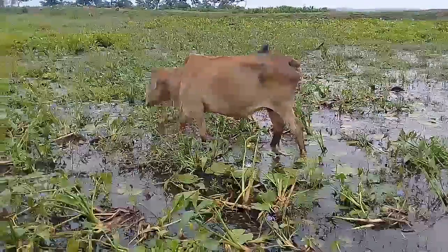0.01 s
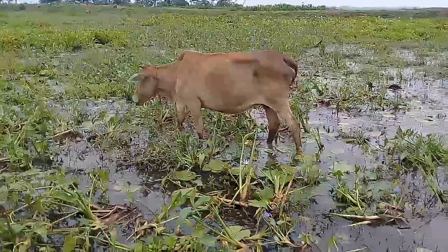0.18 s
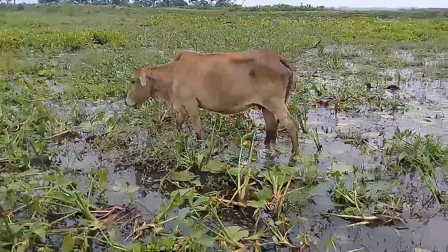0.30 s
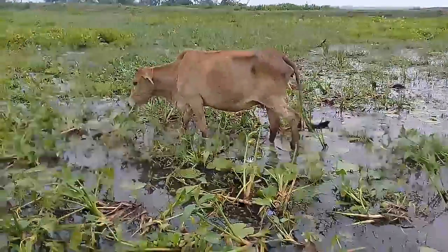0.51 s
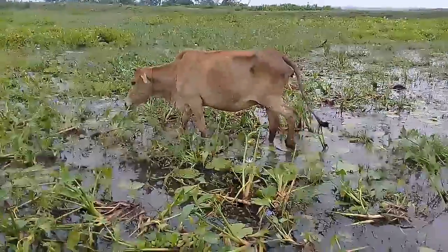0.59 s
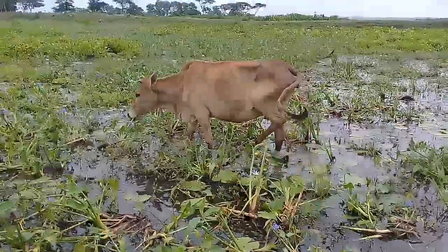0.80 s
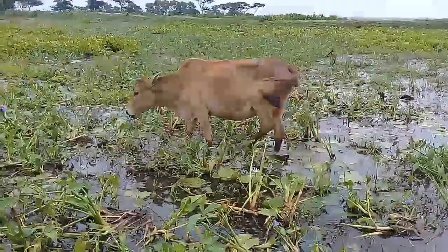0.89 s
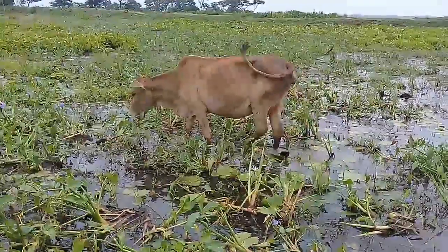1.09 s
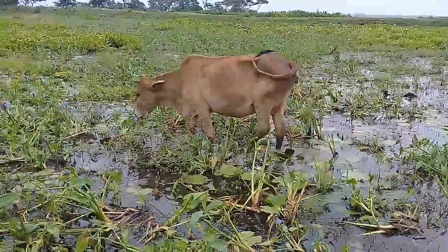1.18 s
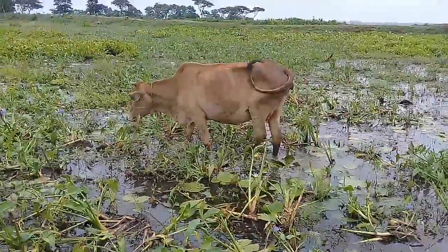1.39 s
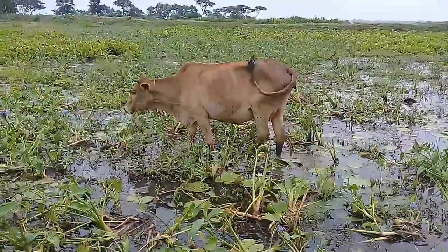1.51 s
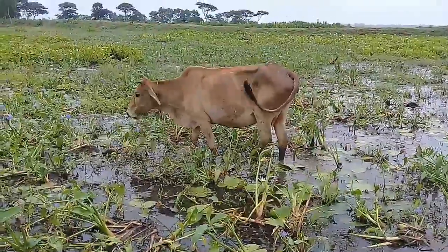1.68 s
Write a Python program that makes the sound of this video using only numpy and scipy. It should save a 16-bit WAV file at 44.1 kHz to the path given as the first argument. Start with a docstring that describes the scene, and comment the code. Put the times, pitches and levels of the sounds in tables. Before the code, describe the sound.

A cow's hooves plop, smack and squelch through shallow marsh water, with wind thumps and insect trill

```python
"""A cow wades through a shallow marsh. First a hoof plops and smacks amid gurgle and spray; then a gust
buffets the microphone; then a dragged leg swishes, and more steps bring plops, gurgle and spray; last come
a burst of wet smacks and a hollow ringing. Insects trill throughout over a quiet open field.
Bubbles and drops are damped sinusoids; smacks, wind, chorus and field are filtered noise."""
import sys
import numpy as np
from scipy import signal
from scipy.fft import rfft, irfft, next_fast_len
from scipy.io import wavfile
from scipy.ndimage import uniform_filter1d

SR = 44100
rng = np.random.default_rng(int(sys.argv[2]) if len(sys.argv) > 2 else 0)


def to_wav(sig):
    """Store sig (one row per channel, or 1-D mono) as 16-bit WAV at the path in sys.argv[1].

    Samples outside -1..1 are clipped; the rate is SR.
    """
    pcm = np.clip(np.atleast_2d(sig), -1, 1) * 32767
    pcm = np.round(pcm).astype(np.int16)
    wavfile.write(sys.argv[1], SR, pcm.T)  # frames by channels


N = 74970  # samples, 1.7 s

# Each *_TRIM_DB is a gain added to the levels of its table.
# Water churned by the hooves: (time [s], level [dB])
GURGLE = [(0, -48), (.046, -60.5), (.072, -52.5), (.15, -75.5), (.6, -83.5), (.73, -74.5), (.818, -53),
          (.885, -57.5), (.94, -71), (.984, -52.5), (1.035, -54.5), (1.15, -61), (1.174, -72), (1.31, -92),
          (1.335, -61), (1.392, -70), (1.402, -59), (1.525, -56.5), (1.556, -70.5), (1.7, -77)]
# Colour of the churned water: (frequency [Hz], level [dB])
GURGLE_SPECTRUM = [(300, -33), (750, -13), (1150, -20.5), (1350, -13), (1530, 0), (1900, -4.5), (2200, -1),
                   (2600, -7), (4200, -17), (8000, -38)]
GURGLE_TRIM_DB, BUBBLES_PER_S = -3, 1200
BUBBLE_CYCLES = 22.7  # mean number of nominal cycles in a 60 dB decay
BUBBLE_RISE = 0.03  # share by which the pitch rises during a 60 dB decay
BUBBLE_SPREAD_DB = 2.5  # scale of the exponential spread of bubble levels
WASH_SHARE = 0.037  # smooth rush under the grains, rms relative to theirs before colouring

# A leg dragging through the water: (peak time [s], level [dB], swell [s], fade [s])
SWISHES = [(0.254, -72, 0.018, 0.056), (0.427, -69, 0.0045, 0.033), (0.769, -52, 0.015, 0.012),
           (.815, -54, 0.014, 0.019), (0.858, -58, 0.014, 0.041)]
# Narrow band of like-sized bubbles: (frequency [Hz], level [dB])
SWISH_SPECTRUM = [(600, -26), (790, -19), (1100, -26.5), (1700, -28), (2000, -7), (2200, 4.5),
                  (2400, -11.5), (2700, -9.5), (3300, -37), (6000, -52)]

# Spray and drops thrown by the hooves: (time [s], level [dB])
SPRAY = [(0, -57.5), (.026, -62.5), (.052, -71.5), (.072, -60), (.09, -67), (.164, -78), (.41, -85.5),
         (.43, -67), (.524, -84.5), (.72, -78), (.865, -62.5), (.895, -64.5), (.946, -68), (.984, -55),
         (1.054, -62.5), (1.08, -58), (1.15, -61), (1.174, -71.5), (1.316, -87), (1.42, -63.5),
         (1.465, -65), (1.488, -57), (1.499, -62), (1.52, -57), (1.54, -80), (1.7, -82)]
# Colour of the spray: (frequency [Hz], level [dB])
SPRAY_SPECTRUM = [(400, -29), (900, -13), (2000, 10), (3000, -5), (3800, 1.5), (4650, -2), (5100, 1.5),
                  (5850, 2), (6200, -3), (7000, -7.5), (8500, -9.5), (11000, -16), (15500, -15)]
SPRAY_TRIM_DB, DROPS_PER_S, DROP_CYCLES, DROP_SPREAD_DB = -2.5, 2200, 65, 3.5
SPATTER_HZ, SPATTER_DB = 108, 1  # drops land in clumps: speed and rms depth

# The finest droplets, swelling up to the end of each splash: (end time [s], level [dB], swell [s])
FIZZES = [(0.086, -69, .04), (.44, -69, 0.013), (1.0, -72, 0.02), (1.15, -73, 0.26), (1.441, -66.5, 0.018),
          (1.521, -62.5, 0.04)]
# Colour of the fine droplets: (frequency [Hz], level [dB])
FIZZ_SPECTRUM = [(5000, -21), (7000, -5), (8500, 1), (9700, 3), (11200, 1), (12500, -10), (15500, -17)]
FIZZ_RELEASE_S, FIZZ_PER_S, FIZZ_CYCLES, FIZZ_SPREAD_DB = 0.0073, 3400, 32, 3

# Single air pockets that pop:
# (time [s], level [dB], starting pitch [Hz], 60 dB decay time [s], pitch rise per 10 ms [share])
PLOPS = [(0.0232, -40, 934, 0.014, 0.093), (.4235, -49, 2180, 0.019, 0.03), (.751, -55, 2130, 0.031, 0.023),
         (.8046, -38.5, 2180, 0.014, .02), (.8155, -34, 2150, 0.011, 0.021), (.818, -48, 1620, .04, .03),
         (0.976, -43.5, 1530, 0.04, 0.051), (1.0266, -26, 2140, 0.0092, 0.11),
         (1.0441, -36, 1920, 0.014, 0.04), (1.0572, -40, 1910, .01, 0.086), (1.124, -51, 3234, .05, 0.011),
         (1.138, -41.5, 2197, 0.029, 0.035), (1.325, -50.5, 1294, 0.055, 0.17),
         (1.366, -54, 1355, 0.066, 0.12), (1.3989, -36.5, 1546, 0.023, 0.484),
         (1.4065, -39, 2380, 0.02, .16), (1.408, -47, 1480, .04, .02), (1.429, -54, 9850, .035, .01),
         (1.4385, -49, 9900, .014, .01), (1.445, -48, 1133, 0.075, 0.029),
         (1.4482, -41.5, 1510, 0.022, 0.088), (1.449, -45, 2350, .02, .03),
         (1.47, -38.5, 1760, 0.014, 0.058), (1.586, -52, 2660, 0.017, 0.073),
         (1.629, -58, 1890, 0.039, 0.035)]
PLOP_ATTACK_S, PLOP_TRIM_DB = 0.0011, -5.5

# Wet smacks of mud and water: (time [s], level [dB], 60 dB decay time [s], centre of the tint [Hz])
SMACKS = [(0.0133, -38, 0.013, 1890), (.0138, -39, 0.022, 6500), (0.0744, -46, .008, 9500),
          (0.079, -38.5, 0.013, 3560), (.095, -51.5, 0.016, 6000), (0.115, -51, 0.024, 6500),
          (.817, -42, .018, 2400), (0.984, -43.5, 0.031, 4300), (1.091, -44, 0.024, 2200),
          (1.112, -55, .01, 6500), (1.445, -42, .026, 1800), (1.457, -43, 0.0094, 5500),
          (1.4692, -44, 0.011, 4200), (1.4782, -38, 0.011, 3900), (1.4843, -42, .02, 4500),
          (1.4912, -45.5, 0.01, 6000), (1.504, -47, .014, 6000), (1.510, -45, 0.014, 5500),
          (1.516, -39.5, 0.015, 4770)]
# Colour shared by the smacks before each tint: (frequency [Hz], level [dB])
SMACK_SPECTRUM = [(300, -45), (1100, -5), (1650, 0.5), (6000, -1.5), (7500, -7), (11000, -4), (15000, -25)]
SMACK_ATTACK_S, SMACK_WIDTH_OCT, SMACK_TRIM_DB = 0.0007, 0.93, -8.5

# The hoof's hollow rings as the last splash drains into it: (mean frequency [Hz], mean level [dB])
HOLLOW = [(3490, -61), (3660, -58), (4160, -61), (5050, -63.5), (5990, -69.5)]
HOLLOW_FULL_S, HOLLOW_END_S, HOLLOW_SWELL_S, HOLLOW_RELEASE_S = 1.493, 1.521, 0.04, 0.0034
HOLLOW_WAVER_HZ, HOLLOW_FLUTTER_DB = 30.3, 2.5  # rms depth in pitch and in level
HOLLOW_FLUTTER_HZ = 110.6  # speed of both

TAIL_T60_S, TAIL_DB = 0.15, -11.5  # scatter from the water and plants

# Wind at the microphone: (time [s], level [dB])
WIND = [(0, -49), (.075, -59), (.15, -54), (.24, -39), (.30, -38.5), (.355, -42), (.375, -56.5),
        (.43, -42.5), (.455, -35.5), (.48, -49.5), (.55, -49), (.59, -55.5), (.625, -51), (.74, -51.5),
        (.79, -46), (.86, -57.5), (.93, -65), (1.12, -66), (1.2, -62), (1.27, -70.5), (1.35, -59),
        (1.43, -66.5), (1.49, -55), (1.56, -67.5), (1.7, -65.5)]
# Colour of the wind rumble: (frequency [Hz], level [dB])
WIND_SPECTRUM = [(20, -9), (40, -3.5), (62, 3), (90, 3.5), (115, -2), (160, -10.5), (250, -16.5),
                 (350, -26), (600, -42.5), (1500, -105)]
# Single eddies that thump the microphone: (time [s], peak level [dB], width [s])
THUMPS = [(0.2386, -31, 0.0031), (.256, -28, 0.0018), (0.2846, -26, 0.0015), (0.304, -25.5, 0.002),
          (0.3372, -25.5, 0.0017), (.354, -25.5, 0.0027), (.452, -25.5, 0.0022), (0.55, -37, 0.003),
          (.643, -43, .0028), (1.201, -51, .0028)]

# The nearest insect: a train of tiny falling chirps
TRILL_PER_S, TRILL_HZ, TRILL_FALL_HZ, TRILL_DB = 180, 9344, 565, -75
TRILL_RATE_DRIFT, TRILL_PITCH_SCATTER_HZ = 0.037, 54.9  # rms share of the rate, rms pitch

# Colour of the insect chorus: (frequency [Hz], level [dB])
INSECTS = [(7000, -26.5), (8400, -13), (9000, -11), (9200, -1), (9450, -3), (9700, -4.5), (10000, -6),
           (10200, -25), (12000, -51)]
INSECT_DB = -76
# Colour of the open field's air: (frequency [Hz], level [dB])
FIELD = [(30, -1.5), (70, 9), (115, 14.5), (190, 6.5), (300, 4), (600, -3.5), (1000, -6), (1600, -11),
         (2250, -8), (3200, -16.5), (4300, -22), (5400, -15.5), (7000, -20.5), (11000, -20), (15500, -20.5)]
FIELD_DB = -65.5
# Colour of a faint hiss, opposite in the two channels: (frequency [Hz], level [dB])
HISS = [(100, -19), (350, -3.5), (650, 0.5), (1200, -8.5), (2500, -10), (5000, 4), (9000, 5.5), (12000, 8),
        (15500, 5), (17000, -28)]
HISS_DB = -84.5
TOP_HZ = 15600


def amp(db):
    """Level and gain: 20 dB is a factor of ten in amplitude."""
    return 10 ** (np.asarray(db) / 20)


def unit(x):
    """Normalization: scale a signal to rms 1."""
    return x / np.sqrt(np.mean(x ** 2) + 1e-20)


def curve(rows):
    """Linear interpolation: one value per sample from (time, value) rows."""
    return np.interp(np.arange(N) / SR, *np.transpose(rows))


def filtered(x, response):
    """Linear filtering: multiply the spectrum by a response of frequency."""
    m = next_fast_len(N + SR // 2)  # zero padding
    spectrum = rfft(x, m) * response(np.fft.rfftfreq(m, 1 / SR))
    return irfft(spectrum, m)[..., :N]


def colour(x, points):
    """Spectral shaping: levels are interpolated over log frequency."""
    f, db = np.transpose(points)
    return filtered(x, lambda hz: amp(np.interp(np.log(hz + 1), np.log(f), db)))


def noise(points):
    """Coloured noise: a shaped Gaussian random signal of rms 1."""
    return unit(colour(rng.standard_normal(N), points))


def wobble(hz):
    """Random modulation: low-passed noise of rms 1 that moves at up to about hz."""
    return unit(filtered(rng.standard_normal(N), lambda f: np.exp(-(f / hz) ** 2)))


def even(x, size):
    """Level control: divide by the local rms over stretches of size samples."""
    power = uniform_filter1d(uniform_filter1d(x ** 2, size), size)
    return x / np.sqrt(np.abs(power) + 1e-12)


def add(track, s, sound):
    """Superposition: mix a sound into the track at time s."""
    part = track[max(round(s * SR), 0):][:len(sound)]
    part += sound[:len(part)]


def swell_and_fade(peak_s, swell_s, fade_s):
    """Exponential growth up to a peak of 1, then exponential decay."""
    t = np.arange(N) / SR
    return np.exp(np.minimum((t - peak_s) / swell_s, (peak_s - t) / fade_s))


def grains(per_s, lo_hz, hi_hz, cycles, rise, spread_db, size):
    """Sum of many damped oscillators, each rising in pitch, on a smooth wash of noise."""
    when, pitch, strength, life = rng.random((int(per_s * N / SR), 4)).T[:, :, None]
    hz = lo_hz * (hi_hz / lo_hz) ** pitch
    turns = hz * np.arange(size) / SR
    age = turns / (cycles * (.5 + life))  # 1 after a 60 dB decay
    level_db = -spread_db * np.log(1 - .98 * strength) - 60 * age
    waves = amp(level_db) * np.sin(2 * np.pi * turns * (1 + rise * age / 2))
    samples = (when * N).astype(int) + np.arange(size)
    weighted = waves * np.sqrt(hz)  # higher grains are stronger
    stream = np.bincount(samples.ravel(), weighted.ravel(), N)[:N]
    return unit(stream) + WASH_SHARE * rng.standard_normal(N)


def gurgle():
    """Bubble resonance: small bubbles stirred up around the legs ring as damped oscillators."""
    bubbles = grains(BUBBLES_PER_S, 614, 3594, BUBBLE_CYCLES, BUBBLE_RISE, BUBBLE_SPREAD_DB, size=1200)
    return amp(curve(GURGLE) + GURGLE_TRIM_DB) * even(colour(bubbles, GURGLE_SPECTRUM), size=600)


def plops():
    """Resonance of an air pocket: it rings briefly and rises in pitch as it surfaces."""
    out, t = np.zeros(N), np.arange(SR // 20) / SR
    for s, db, hz, t60, rise in PLOPS:
        shape = (1 - np.exp(-(t / PLOP_ATTACK_S) ** 2)) * 1000 ** (-t / t60)
        turns = hz * t * (1 + rise * t / .01 / 2)  # integral of a linear pitch rise
        add(out, s, amp(db + PLOP_TRIM_DB) * shape / shape.max() * np.sin(2 * np.pi * turns))
    return out


def smacks():
    """Impulsive noise: short tinted bursts where the mud lets go or water slaps back."""
    out, t = np.zeros(N), np.arange(SR // 20) / SR
    pieces = noise(SMACK_SPECTRUM)[:len(SMACKS) * len(t)].reshape(len(SMACKS), len(t))
    freqs = np.fft.rfftfreq(len(t), 1 / SR) + 1
    for (s, db, t60, hz), spectrum in zip(SMACKS, rfft(pieces)):
        tint = 1 / (1 + (np.log2(freqs / hz) / SMACK_WIDTH_OCT) ** 2)
        slap = even(irfft(spectrum * tint, len(t)), size=100)
        burst = (1 - np.exp(-t / SMACK_ATTACK_S)) * 1000 ** (-t / t60)
        add(out, s, amp(db + SMACK_TRIM_DB) * burst / burst.max() * slap)
    return out


def spray():
    """Superposed drop impacts: drops patter in clumps on water and leaves, each with a short ring."""
    drops = grains(DROPS_PER_S, 2544, 8360, DROP_CYCLES, BUBBLE_RISE, DROP_SPREAD_DB, size=1200)
    level_db = curve(SPRAY) + SPRAY_TRIM_DB + SPATTER_DB * wobble(SPATTER_HZ)
    return amp(level_db) * even(colour(drops, SPRAY_SPECTRUM), size=600)


def swish():
    """Narrow-band bubble resonance: each dragged leg swells and fades in one bubbling band."""
    shape = sum(amp(db) * swell_and_fade(s, swell, fade) for s, db, swell, fade in SWISHES)
    bubbles = grains(BUBBLES_PER_S, 620, 3630, BUBBLE_CYCLES, BUBBLE_RISE, BUBBLE_SPREAD_DB, size=1000)
    return shape * even(colour(bubbles, SWISH_SPECTRUM), size=500)


def fizz():
    """High-pitched damped ringing: the finest droplets build through a splash and stop quickly."""
    shape = sum(amp(db) * swell_and_fade(s, swell, FIZZ_RELEASE_S) for s, db, swell in FIZZES)
    droplets = grains(FIZZ_PER_S, 6500, 12100, FIZZ_CYCLES, BUBBLE_RISE, FIZZ_SPREAD_DB, size=300)
    return shape * even(colour(droplets, FIZZ_SPECTRUM), size=700)


def hollow():
    """Cavity resonance: a few wavering tones swell under the last splash and stop with it."""
    t = np.arange(N) / SR
    swell = (t - HOLLOW_FULL_S) / HOLLOW_SWELL_S
    release = (HOLLOW_END_S - t) / HOLLOW_RELEASE_S
    shape = np.exp(np.minimum(np.minimum(swell, release), 0))  # holds at 1 between the two
    out = np.zeros(N)
    for hz, db in HOLLOW:
        turns = np.cumsum(hz + HOLLOW_WAVER_HZ * wobble(HOLLOW_FLUTTER_HZ)) / SR
        level_db = db + HOLLOW_FLUTTER_DB * wobble(HOLLOW_FLUTTER_HZ)
        out += amp(level_db) * np.sin(2 * np.pi * turns)
    return shape * out


def scatter(x):
    """Diffuse scattering: convolution with decaying noise gives a short tail from water and plants."""
    t = np.arange(SR // 4) / SR
    tail = rng.standard_normal(len(t)) * 1000 ** (-t / TAIL_T60_S)
    return signal.fftconvolve(x, tail / np.linalg.norm(tail))[:N]


def wind():
    """Turbulent pressure: low rumble follows the gust, and single eddies thump the microphone."""
    out = amp(curve(WIND)) * even(noise(WIND_SPECTRUM), size=900)
    for s, db, width in THUMPS:
        u = (np.arange(N) / SR - s) / width
        out += amp(db) * (1 - u ** 2) * np.exp(-u ** 2 / 2)  # a pulse with a dip on either side
    return out


def trill():
    """Amplitude and frequency modulation: one insect's rapid pulses, each sliding down in pitch."""
    rate = TRILL_PER_S * (1 + TRILL_RATE_DRIFT * wobble(16))
    cycle = np.cumsum(rate) / SR % 1
    hz = TRILL_HZ + TRILL_FALL_HZ * (.5 - cycle) + TRILL_PITCH_SCATTER_HZ * wobble(259)
    pulses = np.sin(np.pi * cycle) ** 2 * np.sin(2 * np.pi * np.cumsum(hz) / SR)
    return amp(TRILL_DB) * unit(pulses)


def chorus():
    """Incoherent sum of many sources: insects near and far merge into a steady band of noise."""
    return amp(INSECT_DB) * even(noise(INSECTS), size=500)


def field():
    """Ambient noise: the air of the open field is steady broadband noise."""
    return amp(FIELD_DB) * noise(FIELD)


def hiss():
    """Stationary random noise: a faint coloured hiss."""
    return amp(HISS_DB) * noise(HISS)


def scene():
    """Mid and side superposition: everything sits in the middle; only the hiss has width."""
    water = gurgle() + plops() + smacks() + spray() + swish() + fizz() + hollow()
    mid = water + amp(TAIL_DB) * scatter(water) + wind() + trill() + chorus() + field()
    side = hiss()
    return np.array([mid + side, mid - side])


def record(dry):
    """Band limitation: the recorder keeps nothing at or above its top frequency."""
    return filtered(dry, lambda hz: hz < TOP_HZ)


dry = scene()
out = record(dry)
to_wav(out)
```